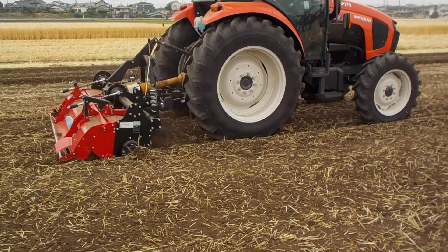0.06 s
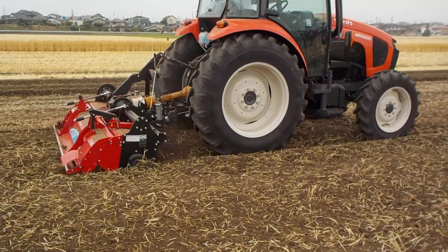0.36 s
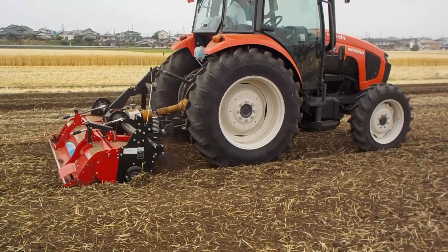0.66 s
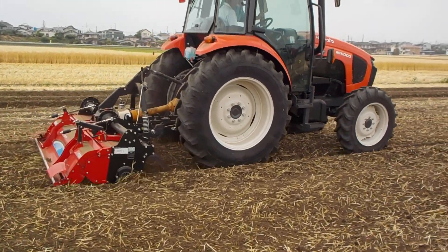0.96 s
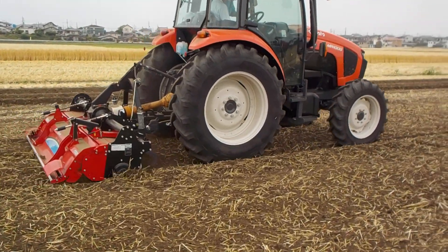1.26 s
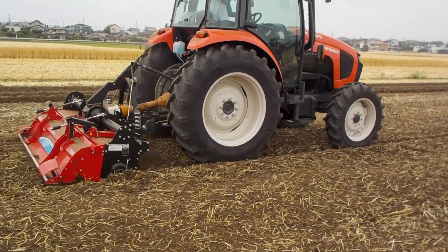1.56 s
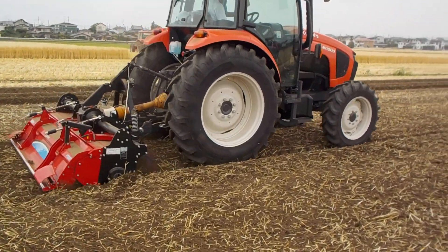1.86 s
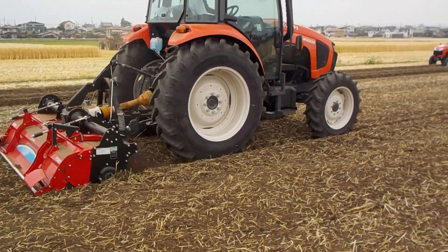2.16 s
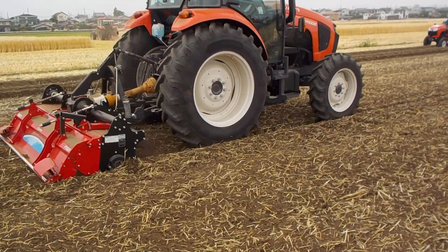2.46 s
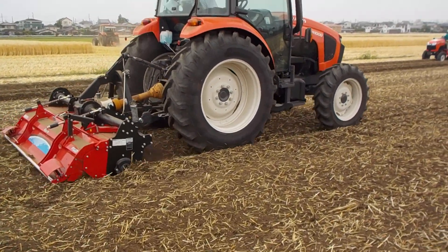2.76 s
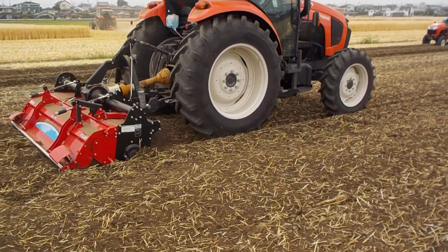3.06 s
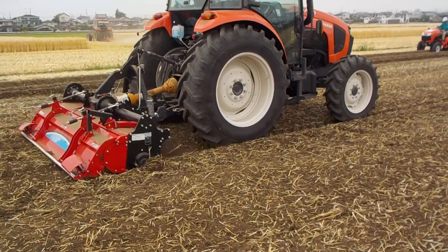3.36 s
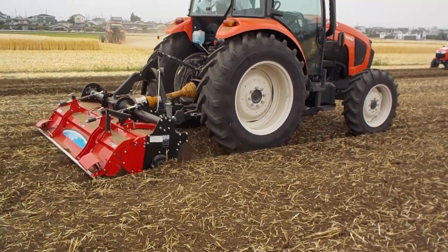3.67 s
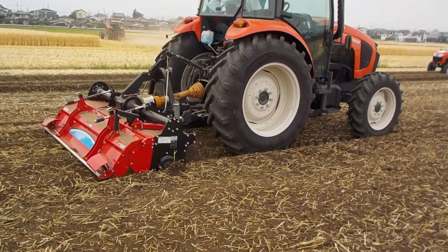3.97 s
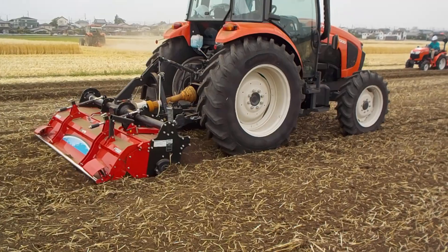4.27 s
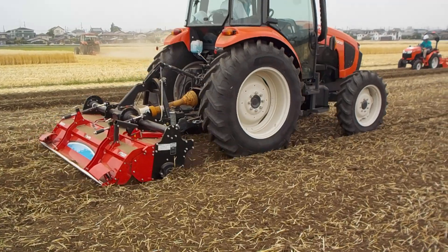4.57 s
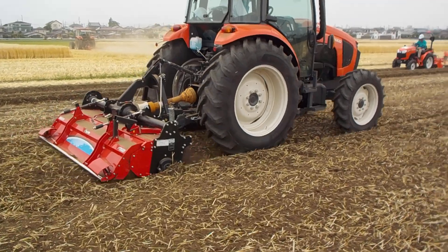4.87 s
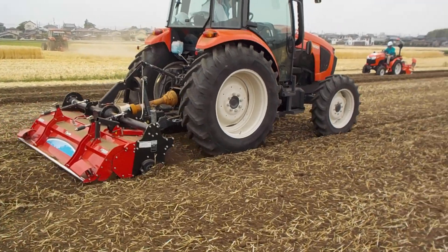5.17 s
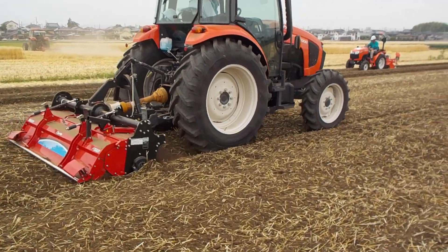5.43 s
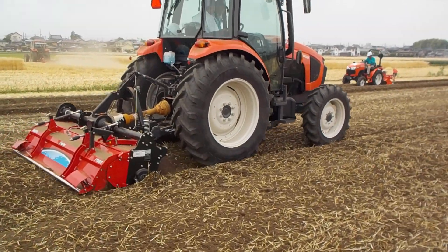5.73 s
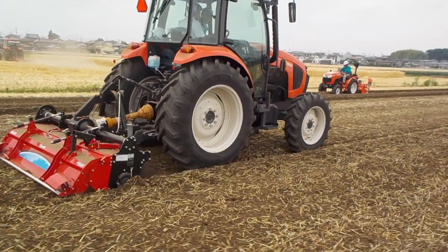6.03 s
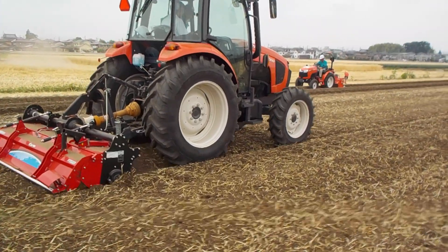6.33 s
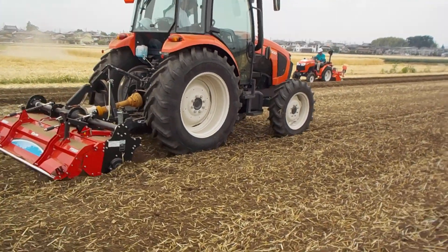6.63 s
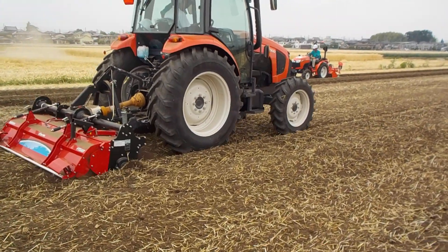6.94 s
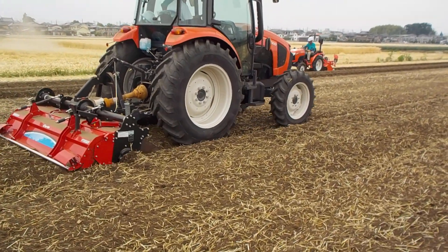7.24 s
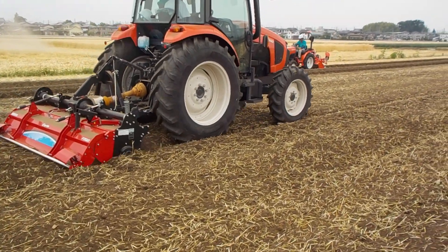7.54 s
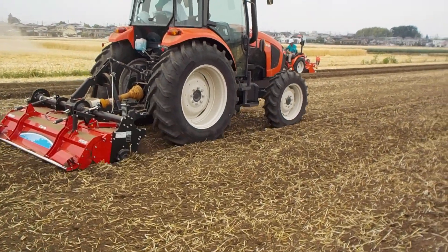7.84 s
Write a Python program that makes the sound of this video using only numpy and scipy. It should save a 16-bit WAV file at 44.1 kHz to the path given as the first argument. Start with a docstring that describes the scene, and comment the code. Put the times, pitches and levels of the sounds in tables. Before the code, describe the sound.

Steady diesel drone and clatter of a nearby tractor tilling soil outdoors, with churning blades, a hiss and a wavering gear whine.

```python
"""A tractor tilling stubble

A four-cylinder diesel tractor pulls a rotary tiller through an open field, so nothing echoes.
A microphone keeps pace a few metres away. The engine knocks and drones at a nearly steady speed,
its belt-driven fan hums, and a gear whines over the churn of the tiller's blades in the soil.
Fuel injection and chopped straw add a hiss that throbs with the engine. Faint ticks come from the right."""
import sys
import numpy as np
from scipy import signal
from scipy.fft import rfft, irfft
from scipy.io import wavfile
from scipy.ndimage import uniform_filter1d

SR = 44100
rng = np.random.default_rng(int(sys.argv[2]) if len(sys.argv) > 2 else 0)


def persist_wave(psi):
    """Save psi, clipped to +-1, as 16-bit WAV."""
    counts = np.round(np.clip(psi, -1, 1) * 32767).astype(np.int16)
    wavfile.write(sys.argv[1], SR, np.atleast_2d(counts).T)


N = 357210  # 8.1 seconds


def amp(db):
    """Turns decibels into a number to multiply by."""
    return 10 ** (np.asarray(db) / 20)


def unit(x):
    """Scales a signal to an average (rms) level of 1."""
    return x / np.sqrt(np.mean(x ** 2) + 1e-20)


def curve(rows, column=1):
    """Reads a time table at every sample."""
    columns = np.transpose(rows)
    return np.interp(np.arange(N) / SR, columns[0], columns[column])


def over_hz(rows, column=1):
    """Reads a frequency table at every frequency."""
    columns = np.transpose(rows)
    return np.interp(np.log(np.fft.rfftfreq(N, 1 / SR) + 1), np.log(columns[0] + 1), columns[column])


def colour(x, spectrum):
    """Shapes a sound's bass and treble from a table, at level 1."""
    return unit(irfft(rfft(x) * amp(over_hz(spectrum)), N))


def lowpass(x, hz):
    """Keeps the part of a sound below `hz`."""
    return irfft(rfft(x) / (1 + (np.fft.rfftfreq(N, 1 / SR) / hz) ** 6), N)


def wander(rate):
    """Drifts to a new random value `rate` times a second."""
    knots = rng.standard_normal(1024)
    return unit(np.interp(np.arange(N) / SR * rate, np.arange(len(knots)), knots))


def swells(rows):
    """A smooth rise and fall for each row."""
    t = np.arange(N) / SR
    return sum(height * np.cos(np.pi * np.clip((t - middle) / length, -.5, .5)) ** 2
               for middle, length, height in rows)


def tones(turns, table, waver_db, waver_rate):
    """Tones at multiples of a turning speed, each wavering on its way through the air."""
    out = np.zeros(N)
    for multiple, db in table:
        level = amp(db + waver_db * wander(waver_rate))
        out += level * np.cos(2 * np.pi * (multiple * turns + rng.random()))
    return np.sqrt(2) * out


# Times when the load eases. Each row: middle in seconds, length in seconds, extra cycles per second.
LOAD_EASES = [(1.55, 1.8, .052), (3.55, 1.9, .044)]

def engine_cycles(cycles_per_s):
    """Counts engine cycles. A governor holds the speed, which rises a touch as the load eases."""
    return np.cumsum(cycles_per_s + swells(LOAD_EASES)) / SR


# The four firings of a cycle. Each row: place in the cycle from 0 to 1, strength in dB.
CYLINDERS = [(.19, 2.5), (.44, 0.7), (.69, -0.8), (.94, 0.1)]

def firings(cycles, jitter_s, uneven_db):
    """One train of blows per cylinder, each blow a little off in time and strength."""
    trains = np.zeros((len(CYLINDERS), N))
    count = np.arange(int(cycles[-1]) + 1)
    for train, (place, db) in zip(trains, CYLINDERS):
        late, strong = rng.standard_normal((len(count), 2)).T
        at = np.interp(count + place, cycles, np.arange(N), right=2 * N) + jitter_s * SR * late
        heard = (at >= 0) & (at < N)
        train[at[heard].astype(int)] = amp(db + uneven_db * strong[heard])
    return trains


# The engine's tones. Each row: multiple of the cycle rate, relative level in dB.
ENGINE_TONES = [(4, -75), (7, -71), (8, -64), (12, -65), (14, -65), (18, -54), (20, -52), (24, -48),
                (25, -49), (26, -43), (27, -41), (31, -48), (32, -43), (33, -45), (35, -47), (38, -46),
                (39, -44), (40, -44), (42, -44), (43, -46), (44, -49), (46, -43), (56, -46), (60, -44),
                (65, -48), (76, -48), (79, -47), (88, -49)]

def engine_drone(cycles):
    """The repeating engine cycle makes a stack of tones."""
    return amp(-0.5) * tones(cycles, ENGINE_TONES, waver_db=1.6, waver_rate=10)


# The fan's tones. Each row: multiple of its turning speed, relative level in dB.
FAN_TONES = [(2, -81), (3, -66), (4, -62), (5, -56), (7, -51), (10, -47), (12, -43), (14, -43), (21, -43)]

def fan_hum(cycles, turns_per_cycle):
    """A belt turns the seven-blade fan out of step with the engine, so their tones beat."""
    return amp(-0.6) * tones(cycles * turns_per_cycle, FAN_TONES, waver_db=2, waver_rate=7)


# Swells of the drive-line tone. Each row: middle in seconds, length in seconds, rise in dB.
DRIVE_SWELLS = [(2.2, 1.8, 7.5), (6.2, 2.2, 8.5)]

def drive_line(cycles, teeth_per_cycle):
    """A gear in the drive line sings a lower tone, out of step with the firings."""
    tone = tones(cycles * teeth_per_cycle, [(1, -46)], waver_db=1.5, waver_rate=6)
    return amp(swells(DRIVE_SWELLS)) * tone


def knocks(trains, ring_s):
    """Each cylinder rings the engine block in its own way, alike from cycle to cycle."""
    t = np.arange(4096) / SR
    rings = rng.standard_normal((len(trains), len(t))) * np.exp(-t / ring_s)
    return unit(signal.oaconvolve(trains, rings, axes=1)[:, :N].sum(0))


def rattle(trains, rise_s, decay_s):
    """A fresh burst of noise swells and dies after every firing."""
    envelope = trains.sum(0)
    for time_s in (rise_s, decay_s):
        envelope = signal.lfilter([1], [1, -np.exp(-1 / (time_s * SR))], envelope)
    return unit(envelope * rng.standard_normal(N))


def churn(lumpy_db, clods_per_s):
    """The tiller's blades break soil and straw in a dense, lumpy stream."""
    return unit(rng.standard_normal(N) * amp(lumpy_db * wander(clods_per_s)))


# How the engine block and tiller hood ring. Each row: frequency in Hz, relative level in dB.
BODY_COLOUR = [(52, -56), (100, -38), (170, -26), (320, -22), (400, -12.5), (580, 0.5), (750, -1.5),
               (795, -5.5), (900, -4.5), (1550, -3.5), (1830, -3.5), (2010, -8.5), (2160, -7),
               (2450, -31.5), (2900, -67)]
# The slow sway in loudness. Each row: time in seconds, growl change in dB, clatter change in dB.
SWAY = [(0.0, 1.2, 1), (1.3, -0.6, 0.2), (2.1, 1, 0.45), (3.2, 0.5, 0.6), (4.4, -0.5, -0.9),
        (4.7, 0.2, -0.0), (5.9, -0.0, -0.7), (7.0, -0.7, 0.46), (8.1, -0.5, -1)]
# Uneven soil makes the growl and the hiss heave at random.
GROWL_HEAVE_DB, HISS_HEAVE_DB, HEAVES_PER_S = 0.23, 0.4, 4

def growl_and_clatter(trains):
    """Knock, rattle and churn sound through block and hood as a low growl and a higher clatter."""
    knock = amp(-9.5) * knocks(trains, ring_s=.022)
    rattling = amp(-7) * rattle(trains, rise_s=0.0024, decay_s=0.016)
    soil = amp(-2) * churn(lumpy_db=.5, clods_per_s=30)
    body = colour(knock + rattling + soil, BODY_COLOUR)
    growl = lowpass(body, hz=1010)
    clatter = body - growl
    growl_db = curve(SWAY, column=1) + GROWL_HEAVE_DB * wander(HEAVES_PER_S)
    return amp(-23.5) * (growl * amp(growl_db) + clatter * amp(curve(SWAY, column=2)))


def reflections(x, share, drift_s):
    """Quick bounces off wheel, cab and ground tint the sound, drifting as the tractor rolls."""
    t, out = np.arange(N) / SR, x.copy()
    for delay_s in (.0023, .0041, .0074):
        out += share * np.interp(t - delay_s - drift_s * wander(1), t, x)
    return unit(out)


# The colour of the hiss. Each row: frequency in Hz, relative level in dB.
HISS_COLOUR = [(1800, -60.5), (2450, -20.5), (2780, -13), (3020, -23), (3250, -12), (3500, -10),
               (4250, -14.5), (4500, -6.5), (5000, -0.5), (6000, -7), (7100, -8.5), (7500, -20),
               (7900, -38.5), (11000, -38), (13000, -46)]

def hiss(trains):
    """Injection hiss throbs with the firings over the steady fizz of chopped straw."""
    injection = amp(-1) * rattle(trains, rise_s=0.0026, decay_s=0.013)
    straw = amp(-1.5) * churn(lumpy_db=-0.03, clods_per_s=40)
    fizz = reflections(injection + straw, share=0.12, drift_s=.00005)
    sway_db = 1.14 * curve(SWAY, column=2)  # swells with the clatter
    heave_db = HISS_HEAVE_DB * wander(HEAVES_PER_S)
    return amp(-33.5 + sway_db + heave_db) * colour(fizz, HISS_COLOUR)


# How loud the gear whines. Each row: time in seconds, level in dB.
WHINE_LEVELS = [(0.0, -40.0), (1.4, -33.5), (1.9, -40.0), (3.6, -32.0), (4.3, -42), (6.1, -41.5),
                (6.5, -37.5), (8.1, -34)]

def gear_whine(cycles, teeth_per_cycle):
    """Meshing teeth whine, fluttering with the load, with a faint tone an octave up."""
    mesh = 2 * np.pi * teeth_per_cycle * cycles + .35 * wander(30)
    level = amp(curve(WHINE_LEVELS) + 2.0 * wander(24))
    return np.sqrt(2) * level * (np.cos(mesh) + amp(-27) * np.cos(2 * mesh))


# Faint, sharp ticks. Each row: start in seconds, relative level in dB.
TICKS = [(0.0957, -37), (0.2379, -45), (0.3745, -40), (1.2451, -44), (1.7589, -45), (2.1026, -43),
         (4.7341, -42), (4.9048, -40), (7.7064, -36), (7.7852, -43)]

def ticks(decay_s, gain_db):
    """Tiny bright clicks, each under a millisecond."""
    out, t = np.zeros(N), np.arange(128) / SR
    for start, db in TICKS:
        click = np.sin(2 * np.pi * rng.uniform(10500, 12500) * t) * np.exp(-t / decay_s)
        out[round(start * SR):][:len(t)] += amp(db + gain_db) * click
    return out


# How the microphone's two openings hear. Each row: frequency in Hz, likeness from 0 to 1,
# how far the left is ahead in radians, how much louder the left is in dB.
MIC_OPENINGS = [(60, 0.98, 0, 0), (352, 1, 0.023, -1.5), (900, 1, 0.0076, -0.5), (1810, 1, -0.13, -0.6),
                (2730, .999, -0.055, 0), (4100, 1, 0.027, 1), (4370, 1, -.1, 5.5), (4900, 1, -0.56, -1.3),
                (5900, 1, 0.077, 2.3), (6730, 0.8, -0.78, -2), (7250, 1, -0.33, 6), (8300, .98, 0.13, -6.5),
                (11100, 0.87, -.6, 2.5), (14000, 0.35, -0.18, 0)]

def microphone(x):
    """Two close openings hear nearly the same bass but differ in the treble."""
    spectrum = rfft(x)
    likeness = np.clip(over_hz(MIC_OPENINGS, column=1), 0, 1)
    power = uniform_filter1d(abs(spectrum) ** 2, size=200)
    scattered = np.sqrt(abs(power) / N) * rfft(rng.standard_normal(N))  # noise of the same colour
    shared = np.sqrt((1 + likeness) / 2) * spectrum
    apart = np.sqrt((1 - likeness) / 2) * scattered
    tilt = amp(over_hz(MIC_OPENINGS, column=3) / 2) * np.exp(.5j * over_hz(MIC_OPENINGS, column=2))
    return irfft(np.array([(shared + apart) * tilt, (shared - apart) / tilt]), N)


def scene():
    """One crankshaft drives the firings, the engine tones, the fan and the gears."""
    cycles = engine_cycles(cycles_per_s=22.564)
    trains = firings(cycles, jitter_s=.0001, uneven_db=1.45)
    hum = engine_drone(cycles) + fan_hum(cycles, turns_per_cycle=2.1896)
    hum += drive_line(cycles, teeth_per_cycle=33.2)
    hum *= amp(1.5 * curve(SWAY, column=1))  # swells with the growl
    tractor = hum + growl_and_clatter(trains) + hiss(trains) + gear_whine(cycles, teeth_per_cycle=80)
    to_the_right = amp([[-13], [0]])
    return microphone(tractor) + to_the_right * ticks(decay_s=.00008, gain_db=13.0)


def record(dry):
    """Cuts a narrow band near 8 kHz and the very highest treble."""
    notch = signal.firwin(1023, [7880, 8230], fs=SR)
    treble_cut = signal.firwin(511, 15830, window=("kaiser", 9), fs=SR)
    return signal.oaconvolve(dry, np.convolve(notch, treble_cut)[None], "same", axes=1)


dry = scene()
out = record(dry)
persist_wave(out)
```